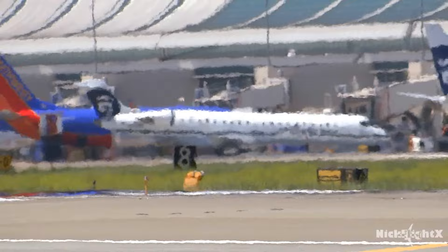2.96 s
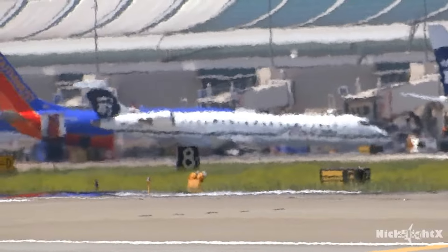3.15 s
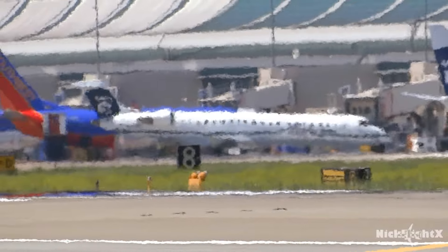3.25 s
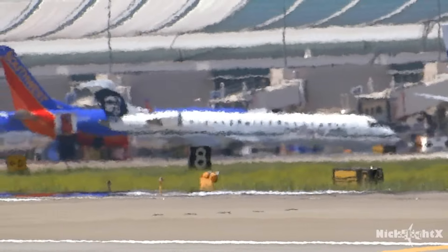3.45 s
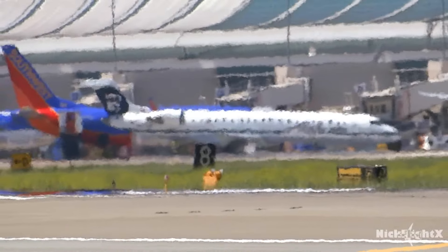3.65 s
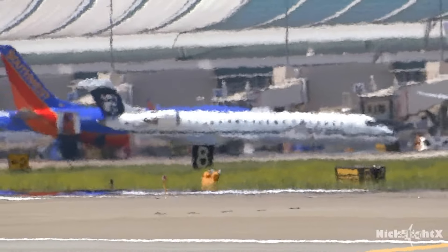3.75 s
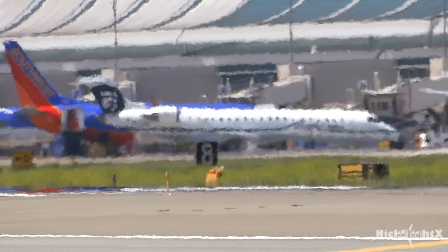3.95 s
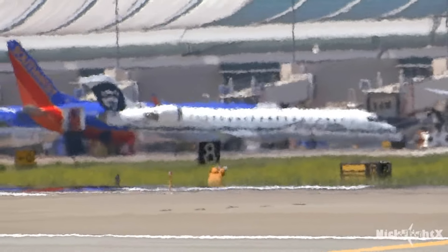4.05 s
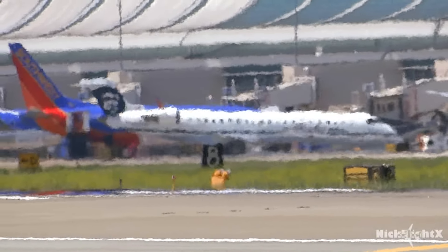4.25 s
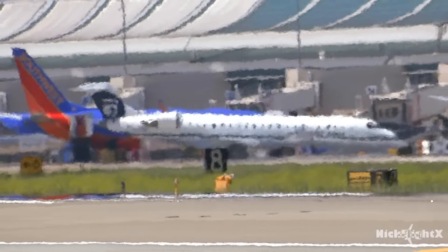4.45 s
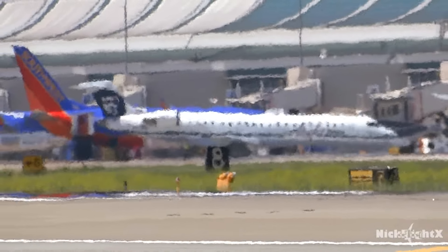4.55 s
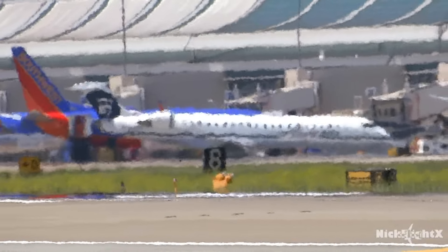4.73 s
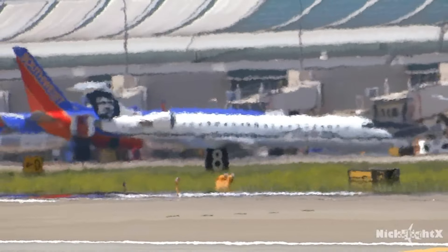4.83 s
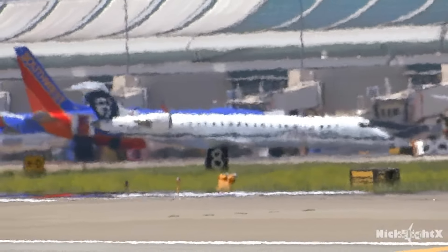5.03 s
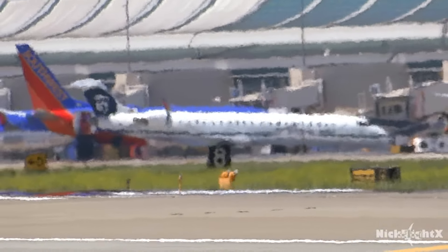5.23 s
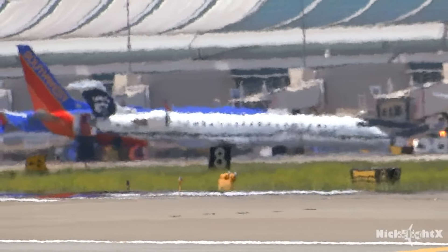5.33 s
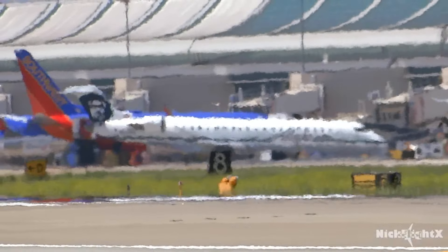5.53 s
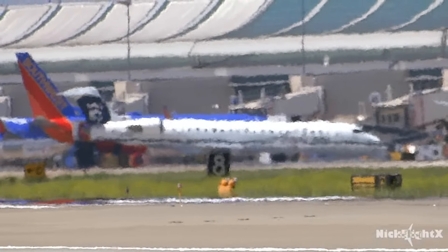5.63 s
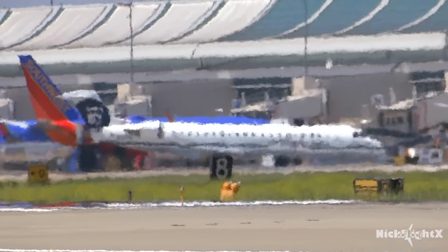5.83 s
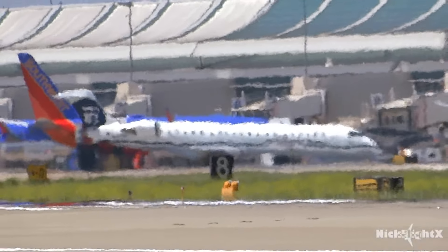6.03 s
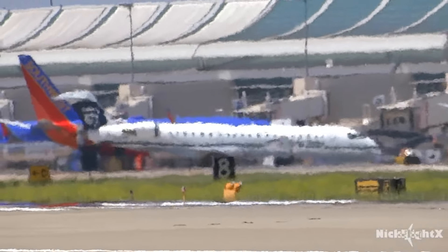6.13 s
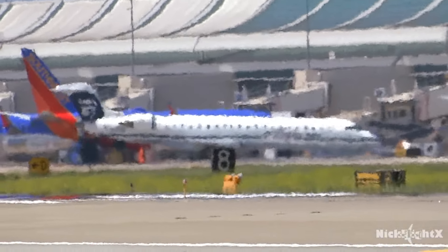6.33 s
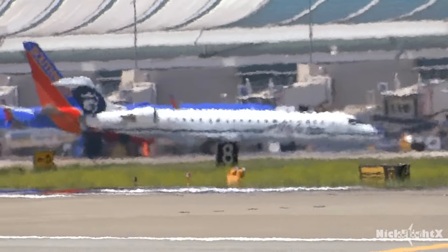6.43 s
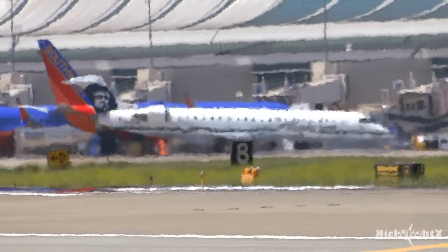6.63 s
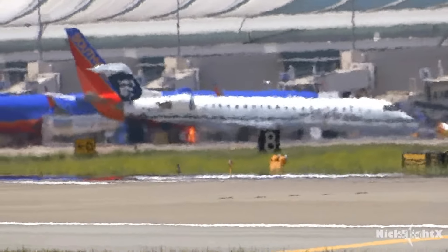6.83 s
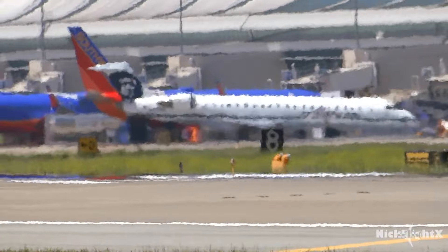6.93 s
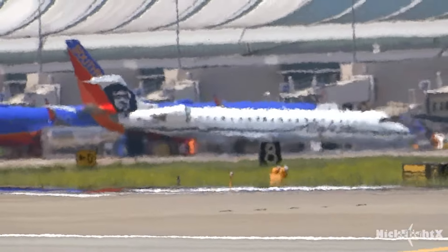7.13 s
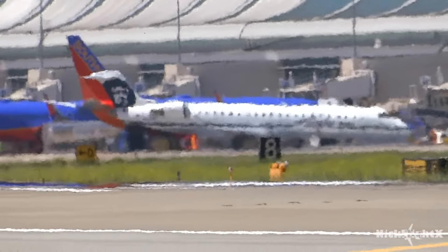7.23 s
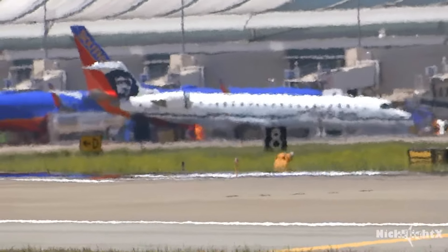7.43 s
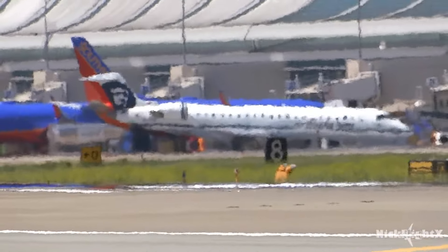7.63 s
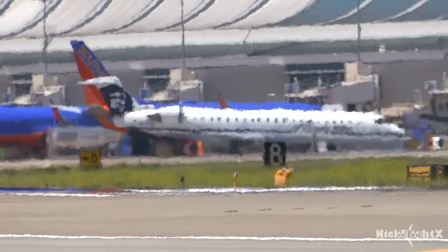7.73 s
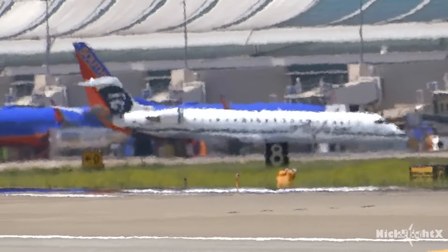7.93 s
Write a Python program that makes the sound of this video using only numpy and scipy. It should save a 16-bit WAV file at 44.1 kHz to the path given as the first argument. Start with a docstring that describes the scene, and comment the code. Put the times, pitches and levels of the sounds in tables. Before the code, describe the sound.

A distant jet's rushing roar swells, dips and returns much louder and hissier, while low gusty rumble and sharp crackles buffet from the left.

```python
"""At an airfield fence, a small camera microphone hears a jet spool up on a distant runway.
Jet mixing noise rumbles from the left in gusty lumps, with steep pressure fronts crackling over it.
A roar of shaped noise ahead swells twice and brightens to a turbulent hiss, beside faint resonant bands.
The camera body cuts treble notches whose depth follows the bearing; small parts tick as struck resonances."""
import sys
import numpy as np
from scipy import signal
from scipy.io import wavfile
from scipy.ndimage import uniform_filter1d

SR = 44100
rng = np.random.default_rng(int(sys.argv[2]) if len(sys.argv) > 2 else 0)


def master(y):
    """Save y as 16-bit WAV."""
    cut = np.clip(np.atleast_2d(y).T, -1, 1)
    pcm = np.round(cut * 32767)  # scale
    wavfile.write(sys.argv[1], SR, pcm.astype(np.int16))


N = 351918  # samples
FRAME = 512  # samples, the shortest analysis frame


def undb(db):
    """Level: decibels to an amplitude ratio."""
    return 10 ** (np.asarray(db) / 20)


def over_hz(table, hz):
    """Log-frequency interpolation: a table of (Hz, value) as a column."""
    at, value = np.transpose(table)
    return np.interp(np.log(hz + 1), np.log(at + 1), value)[:, None]


def over_s(table, s):
    """Linear interpolation in time: the value columns of a table at times s."""
    at, *columns = np.transpose(table)
    return [np.interp(s, at, column) for column in columns]


def walk(rate, length, step, count=1):
    """Smoothed random process: rows that change about rate times a second; spread 1."""
    window = max(int(1 / rate / step), 1)
    rows = rng.standard_normal((count, length))
    for _ in range(2):
        rows = uniform_filter1d(rows, window, axis=1)
    return rows / rows.std()


def patches(hz, s, rate, count):
    """Turbulent coherence: neighbouring bands flicker together, far ones alone; spread near 1."""
    rows = walk(rate, len(s), s[1] - s[0], count=count)
    place = np.log2(np.maximum(hz, 30) / 30) / np.log2(SR / 60) * (count - 1)
    return np.array([np.interp(place, np.arange(count), moment) for moment in rows.T]).T


def bump(hz, centre_hz, octaves):
    """Resonance-like bell: height 1, Gaussian on a log-frequency axis, octaves its standard deviation."""
    return np.exp(-.5 * (np.log2((hz[:, None] + 1) / centre_hz) / octaves) ** 2)


def bend(hz, corners_hz, low_db, high_db):
    """Spectral tilt: each end moves about the middle by its departure from its own mean."""
    low = over_hz(list(zip(corners_hz, (1, 0, 0))), hz)
    high = over_hz(list(zip(corners_hz, (0, 0, 1))), hz)
    return low * (low_db - low_db.mean()) + high * (high_db - high_db.mean())


# sound that differs between the ports, relative to the shared sound: pitch_hz [Hz], level_db [dB]
UNSHARED_SOUND = [(40, -18), (400, -19), (900, -26), (2000, -24), (2650, -10.5), (3200, -16), (3950, -7),
                  (4800, -11), (6900, -27), (9600, -9), (11200, -12), (12200, -32), (15000, -34)]


def shaped(db_of, size, drive, lead):
    """Partial coherence: two close ports hear shared noise plus a little of opposite sign.

    db_of(hz, s) gives (shape dB, level dB); lead(hz, s) is the phase lead of the left port in radians."""
    hz, s, noise = signal.stft(drive, SR, nperseg=size, noverlap=size * 3 // 4)
    shape_db, level_db = db_of(hz, s)
    gain = undb(shape_db)
    turn = np.exp(.5j * lead(hz, s))  # half the lead on each port
    shared = noise[0]
    own = noise[1] * undb(over_hz(UNSHARED_SOUND, hz))
    pair = gain * np.array([shared * turn + own, shared / turn - own])
    # the shape's typical power is divided out, so the level curve sets loudness
    pair *= undb(level_db) / np.sqrt(np.median(np.mean(gain ** 2, axis=0)))
    return signal.istft(pair, SR, nperseg=size, noverlap=size * 3 // 4)[1][:, :N]


def panned(pair, pan_db):
    """Level difference between ports: louder on the left by pan_db, half on each port."""
    return pair * undb(np.array([[.5], [-.5]]) * pan_db)


# gusts of the rumble: start_s [s], length_s [s], level_db [dB]
RUMBLE_GUSTS = [(0.108, 0.16, -34.5), (0.461, 0.063, -34), (0.866, 0.17, -30.5), (1.1, 0.15, -33),
                (1.449, 0.086, -32), (1.549, 0.089, -33), (1.88, 0.12, -34), (2.063, 0.04, -34),
                (2.223, 0.054, -29.5), (2.3, 0.072, -33), (2.396, 0.28, -30), (2.715, 0.119, -28),
                (2.93, 0.081, -31), (3.037, 0.23, -29.5), (3.296, 0.049, -35), (3.352, 0.083, -29),
                (3.474, 0.083, -28.5), (3.65, 0.11, -32.5), (4.246, 0.062, -33), (4.363, 0.18, -32),
                (4.603, 0.32, -28.5), (4.966, 0.079, -33.5), (5.29, 0.077, -31), (5.54, 0.34, -30),
                (6.05, 0.057, -34), (6.112, 0.14, -27), (7.097, 0.033, -25.5), (7.283, 0.062, -28.5),
                (7.387, 0.022, -30), (7.506, 0.037, -29), (7.612, 0.033, -30.5), (7.85, 0.15, -30)]
GUST_EDGE_S = 0.02
LUMP_DB, LUMPS_PER_S = 2.5, 4.7


def gusts(s, calm_db):
    """Power addition: soft-edged gusts add to a calm level that wobbles in lumps; returns dB."""
    start, length, db = np.transpose(RUMBLE_GUSTS)[:, :, None]

    def soft(x):
        return .5 + .5 * np.tanh(2 * x / GUST_EDGE_S)

    blowing = soft(s - start) * soft(start + length - s)
    calm = undb(calm_db + LUMP_DB * walk(LUMPS_PER_S, len(s), s[1])[0]) ** 2
    return 10 * np.log10(calm + np.sum(blowing * undb(db) ** 2, axis=0))


# rumble between gusts: start_s [s], level_db before lumps [dB], tilt [dB per octave]
RUMBLE_CALM = [(0, -35, -1), (1.2, -36.5, 0), (2, -36.5, -0.5), (3, -34, 0), (3.95, -35, -1),
               (4.3, -29.5, -1), (4.8, -31.5, -1), (5.4, -32, -1), (5.7, -27, -0.5), (6, -33, 0),
               (6.6, -31.5, -0.5), (7, -36, 3), (7.98, -32, 0)]
# spectral density of the rumble: pitch_hz [Hz], level_db [relative dB per Hz]
RUMBLE_SPECTRUM = [(12, -58), (25, -50), (60, -12.5), (150, -1.5), (220, -2.5), (340, -8), (500, -14.5),
                   (1000, -23), (2000, -41.5), (2600, -66), (3500, -72)]
RIGHT_LAG_S = 0.00052  # sound from the left reaches the right port late


def rumble():
    """Jet mixing noise: a smooth random part plus scattered steep kicks, delayed at the right port."""
    def db_of(hz, s):
        calm_db, tilt = over_s(RUMBLE_CALM, s)
        tilt_db = tilt * np.clip(np.log2((hz[:, None] + 1) / 150), -2, 1.5)
        flicker_db = .4 * patches(hz, s, 12, count=14)
        return over_hz(RUMBLE_SPECTRUM, hz) + tilt_db + flicker_db, gusts(s, calm_db)

    def lead(hz, s):
        return 2 * np.pi * RIGHT_LAG_S * hz[:, None]

    kicks = (rng.random((2, N)) < 60 / SR) * rng.standard_normal((2, N))  # about 60 a second
    drive = rng.standard_normal((2, N)) + 0.5 * kicks / kicks.std()
    return shaped(db_of, 4 * FRAME, drive / drive.std(), lead)


# bearing of the sound: start_s [s], side_on [0-1], wandering notch_hz [Hz], notch depth_db [dB]
BEARING_PATH = [(0, 0.24, 9500, 3), (2, 0.33, 9500, 2), (2.6, 0, 9800, 10), (3.8, 0.13, 9900, 10),
                (4.4, 0.26, 9500, 3), (5.2, 0.7, 9100, -3), (5.45, 0.76, 8800, 9), (6.35, 1, 8800, 9),
                (6.5, 0.8, 9700, 9), (6.95, 0.77, 10000, 10), (7.1, 0.18, 10800, -7), (7.45, 0, 10900, 3),
                (7.6, 0.08, 10800, 8), (7.98, 0.48, 10800, 2)]
# phase lead of the left port, turning over at the notches: pitch_hz [Hz], head_on [rad], side_on [rad]
PORT_LEADS = [(0, 0, 0), (800, -0.09, 0.21), (2000, -0.31, -0.28), (2500, -.1, -1.4), (2850, 0.21, 0.85),
              (3790, 0.48, -0.11), (4200, -0.34, .3), (5680, 0.37, -0.35), (6800, 0.11, -0.14),
              (8870, .3, -0.86), (9730, -.2, 0.48), (10200, -.5, 0.27), (11500, 0, -0.27), (16000, 0, 0)]


def ahead(hz, s):
    """Interaural-like phase: the left port's lead for roar and hiss, set by their bearing."""
    at, *leads = np.transpose(PORT_LEADS)
    head_on, side_on = (over_hz(list(zip(at, lead)), hz) for lead in leads)
    return head_on + over_s(BEARING_PATH, s)[0] * (side_on - head_on)


# course of the roar: start_s [s], level_db near 1 kHz before the whole-layer lift [dB],
# low_flank_db and high_flank_db [dB, used about their means], pan_db left minus right [dB], hump_hz [Hz]
ROAR_COURSE = [(0.0, -39, -10, -9, 0.5, 891), (0.18, -37.5, -4, -10, 0.5, 800),
               (0.44, -34, -7.5, -10.5, 0, 890), (1.11, -39, -5, -9, 0.5, 980),
               (1.13, -42.5, -1.5, -6, 0, 835), (1.98, -38, -6, -6.5, 1.0, 940),
               (2.4, -30, -8, -13.5, 2, 870), (2.71, -28.5, -11, -13, 2.0, 870),
               (3.33, -30, -9, -4, 1, 950), (3.78, -31.5, -9.5, -10, 0.5, 720),
               (3.8, -35, -4, -11, 1.0, 751), (3.89, -31.5, -12, -14, 1.0, 810),
               (4.27, -31.5, -5, -12.5, 0.5, 771), (4.35, -32, -10, -12, 0.0, 865),
               (5.13, -37.5, -1, -2, -0.5, 930), (5.58, -32, -8, -1.5, -0.5, 1130),
               (5.62, -38, -3, 5, -0.5, 920), (5.8, -32, -7, 5, -1, 1120), (6.27, -24, -14.5, 9, -1, 1030),
               (6.82, -21, -9.5, -2, -1, 1155), (7.11, -21.5, -5.5, -6, 0, 1000),
               (7.44, -24.5, -5.5, -4, 1, 1040), (7.96, -30.5, -1, -1.5, 2.0, 1060),
               (7.98, -29, -3, 3, 2.0, 961)]
# spectral density of the roar: pitch_hz [Hz], level_db [relative dB per Hz]
ROAR_SPECTRUM = [(250, -39), (400, -2), (600, -0.5), (1100, -1), (1350, -4.5), (1600, -3), (2050, -8.5),
                 (2400, -22), (2750, -43), (3300, -62)]
# upper hump of the roar: start_s [s], pitch_hz [Hz], height_db [dB]
ROAR_UPPER_HUMP = [(0.0, 1490, 6), (1.53, 1510, 5), (2.64, 1520, -0.5), (3.49, 1820, 3.5),
                   (4.31, 1550, 3.5), (5.2, 1620, 8.5), (6.24, 1840, 1), (7.31, 1480, 5.5),
                   (7.98, 1440, 5.5)]
FLANK_HZ = (510, 1060, 1880)  # lower flank, middle, upper flank
HUMP_DB, HUMP_OCTAVES = 6, 0.33
EDGE_HZ, EDGE_OCTAVES, EDGE_DB = 2534, 0.26, 9  # head on, the roar reaches higher
ROAR_WHOLE_DB = 3  # lift from the level near 1 kHz to the whole layer


def roar():
    """Broadband jet noise: the middle of the rush, its hump and flanks moving as the sound path shifts."""
    def db_of(hz, s):
        level_db, low_db, high_db, _, hump_hz = over_s(ROAR_COURSE, s)
        upper_hz, upper_db = over_s(ROAR_UPPER_HUMP, s)
        head_on = 1 - over_s(BEARING_PATH, s)[0]
        shape_db = over_hz(ROAR_SPECTRUM, hz) + bend(hz, FLANK_HZ, low_db, high_db)
        shape_db += HUMP_DB * bump(hz, hump_hz, HUMP_OCTAVES)
        shape_db += upper_db * bump(hz, upper_hz, 0.28)
        shape_db += head_on * EDGE_DB * bump(hz, EDGE_HZ, EDGE_OCTAVES)
        return shape_db + 0.3 * patches(hz, s, 4.7, count=40), level_db + ROAR_WHOLE_DB

    return shaped(db_of, 2 * FRAME, rng.standard_normal((2, N)), ahead)


# course of the hiss: start_s [s], level_db near 7 kHz before the whole-layer lift [dB],
# low_end_db, upper_middle_db and top_end_db [dB, each used about its mean]
HISS_COURSE = [(0.0, -68, -2, -10, -9), (0.18, -68.5, -0.5, -6.5, -5), (0.95, -66, -2.5, -10.5, -11),
               (1.29, -72.5, 4, -9, -4), (1.49, -64.5, -5, -8.5, -12), (2.2, -67, 0.5, -13, -10),
               (2.69, -63, 1, -12, -15), (2.8, -55, -5, -14, -22), (3.22, -53.5, -6.5, -5, -19),
               (3.33, -49.5, -16, -4, -16), (3.42, -54, -8, -6, -16), (3.69, -51.5, -8, -4, -12),
               (3.98, -62.5, -5, -5, -12), (4.93, -69.5, 6, -10.5, -8), (5.47, -61.5, 0.5, -16.5, -12),
               (5.96, -47, 3, -9.5, -18), (5.98, -51.5, 2.5, -8.5, -22), (6.11, -46, -0.5, -11.5, -18),
               (6.38, -38, -3, -8, -22.5), (6.75, -37.5, -2.5, -10, -17), (7.07, -45, -5.5, -4, -14),
               (7.27, -44.5, -2, -3, -9), (7.69, -47.5, 0.5, -15, -11.5), (7.91, -51.5, 2, -7, -9),
               (7.98, -49.5, -1.5, -10, -10)]
# spectral density of the hiss: pitch_hz [Hz], level_db [relative dB per Hz]
HISS_SPECTRUM = [(1800, -4.5), (2400, 3), (3200, 4), (3700, -6.5), (4800, -7.5), (6000, 2), (6600, 0.5),
                 (8500, -3), (9700, -7.5), (10800, -15), (11600, -17.5), (13300, -20), (14400, -16),
                 (15700, -29)]
# notches of the camera body: pitch_hz [Hz], width_hz [Hz], head_on_depth_db [dB], side_on_depth_db [dB]
BODY_NOTCHES = [(2520, 360, -8, 19), (3957, 138, 5, 20), (5720, 450, 3.5, 17), (9000, 1050, -1.5, 6.5),
                (10740, 250, 5, 6), (13300, 920, -3, 17)]
END_HZ = (3600, 6900, 12000)  # low end, middle, top end
MIDDLE_HZ, MIDDLE_OCTAVES = 5000, 0.12
HISS_WHOLE_DB = 5.5  # lift from the level near 7 kHz to the whole layer


def hiss():
    """Fine-scale turbulence: flickering treble noise through the diffraction-like notches of the body."""
    def db_of(hz, s):
        level_db, low_db, middle_db, top_db = over_s(HISS_COURSE, s)
        side_on, notch_hz, notch_db = over_s(BEARING_PATH, s)
        shape_db = over_hz(HISS_SPECTRUM, hz) + bend(hz, END_HZ, low_db, top_db)
        shape_db += (middle_db - middle_db.mean()) * bump(hz, MIDDLE_HZ, MIDDLE_OCTAVES)
        shape_db -= notch_db * bump(hz, notch_hz, .03)
        # a band above the notch moves the opposite way
        shape_db += 0.35 * notch_db * bump(hz, 1.15 * notch_hz, 0.032)
        for centre_hz, width_hz, head_db, side_db in BODY_NOTCHES:
            depth_db = head_db + side_on * (side_db - head_db)  # negative depth is a peak
            shape_db -= depth_db * bump(hz, centre_hz, width_hz / centre_hz)
        flicker_db = 0.98 * walk(29, len(s), s[1]) + 1.1 * patches(hz, s, 3.0, count=40)
        return shape_db + flicker_db, level_db + HISS_WHOLE_DB

    return shaped(db_of, FRAME, rng.standard_normal((2, N)), ahead)


def band(hz, width_hz):
    """Cascaded resonance: noise through one resonance twice; rms 1."""
    b, a = signal.iirpeak(hz, hz / width_hz, SR)
    noise = rng.standard_normal(N)
    ringing = signal.lfilter(b, a, signal.lfilter(b, a, noise))
    return ringing / ringing.std()


# thin lasting bands: pitch_hz [Hz], width_hz of each resonance pass [Hz], level_db before wobble [dB]
WHINE_BANDS = [(11620, 260, -85), (12950, 60, -96)]
# brief swell of a narrow band: start_s [s], level_db before flutter [dB]
NARROW_SWELL = [(1.25, -90), (1.42, -71), (1.7, -64), (1.95, -72), (2.15, -102)]
NARROW_HZ, NARROW_WIDTH_HZ = 6000, 340


def whine():
    """Narrow-band noise: faint thin bands high in the treble, and one fluttering swell."""
    lasting = np.zeros(N)
    for hz, width_hz, db in WHINE_BANDS:
        wobble_db = 1.5 * walk(4, N, 1 / SR)[0]
        lasting += undb(db + wobble_db) * band(hz, width_hz)
    flutter_db = 1.5 * walk(25, N, 1 / SR)[0]
    swell_db = over_s(NARROW_SWELL, np.arange(N) / SR)[0] + flutter_db
    return lasting + undb(swell_db) * band(NARROW_HZ, NARROW_WIDTH_HZ)


# loudest crackles: start_s of the front's middle [s], thud_db before its envelope [dB],
# snap_db peak before pan [dB]
CRACKLE_FRONTS = [(0.196, -20.5, -38), (.537, -13.5, -29), (0.869, -21, -24), (1.132, -24, -39),
                  (1.49, -18, -26), (1.611, -20, -19), (2.265, -31, -26), (2.65, -37, -35),
                  (2.894, -23, -17), (3.882, -21, -23), (4.252, -18, -21), (4.331, -22, -23),
                  (4.456, -15, -28), (4.506, -15, -43), (4.79, -14.5, -26), (4.97, -27, -22),
                  (5.225, -18, -18), (5.58, -32, -17), (5.63, -38, -18), (7.125, -13, -25),
                  (7.321, -36, -33), (7.531, -21, -28), (7.713, -16, -25), (7.918, -29, -22)]
THUD_HZ = 254
SNAP_HZ, SNAP_S = (493, 2130), 0.00049  # pass band, envelope half-width at 1/e


def crackles():
    """Steep pressure fronts from the left: one low push and pull with a short snap on top."""
    out = np.zeros(N)
    t = np.arange(-512, 512) / SR
    edge = signal.butter(4, SNAP_HZ, "bandpass", fs=SR, output="sos")
    bursts = rng.standard_normal((len(CRACKLE_FRONTS), len(t)))
    for (s, thud_db, snap_db), burst in zip(CRACKLE_FRONTS, bursts):
        thud = -np.sin(2 * np.pi * THUD_HZ * t) * np.exp(-(THUD_HZ * t / 0.38) ** 2)
        snap = signal.sosfiltfilt(edge, burst * np.exp(-(t / SNAP_S) ** 2))
        i = int((s + t[0]) * SR)
        out[i:i + len(t)] += undb(thud_db) * thud + undb(snap_db) * snap / np.abs(snap).max()
    return np.array([out, np.roll(out, int(RIGHT_LAG_S * SR))])


# ticks of small parts: start_s [s], level_db peak [dB], pitch_hz [Hz], width_hz of each pass [Hz],
# t60_s of the exciting burst [s]
PART_TICKS = [(.962, -52, 8000, 5000, .06), (.974, -48, 8500, 7000, .05), (.986, -47, 8000, 7000, .025),
              (1.611, -40, 3200, 3500, 0.006), (1.657, -59, 6050, 500, 0.036),
              (4.253, -53, 3300, 5000, .004), (4.332, -49, 3300, 5000, .004),
              (4.457, -50, 3300, 5000, .004), (4.81, -46, 3300, 3500, .006), (5.945, -60, 9000, 9000, .01),
              (6.449, -35, 14500, 4000, 0.022)]


def ticks():
    """Impulsive excitation close to the microphone: a decaying noise burst through a resonance twice."""
    out = np.zeros(N)
    t = np.arange(int(.05 * SR)) / SR
    bursts = rng.standard_normal((len(PART_TICKS), len(t)))
    for (s, db, hz, width_hz, t60), burst in zip(PART_TICKS, bursts):
        b, a = signal.iirpeak(hz, hz / width_hz, SR)
        decaying = burst * undb(-60 * t / t60)
        tick = signal.lfilter(b, a, signal.lfilter(b, a, decaying))
        i = int(s * SR)
        out[i:i + len(t)] += undb(db) * tick / np.abs(tick).max()
    return out


def scene():
    """Superposition: all sources add at the two ports, ticks and whine alike in both."""
    rush_pan_db = over_s(ROAR_COURSE, np.arange(N) / SR)[3]
    from_left = panned(rumble() + crackles(), .5)  # dB, left minus right
    rush = panned(roar() + hiss(), rush_pan_db)
    return from_left + rush + ticks() + whine()


def record(dry):
    """Band limiting: the recorder cuts the top with a steep elliptic low-pass at 15.5 kHz."""
    low_pass = signal.ellip(14, .2, 80, 15500, fs=SR, output="sos")
    return signal.sosfilt(low_pass, dry)


dry = scene()
out = record(dry)
master(out)
```